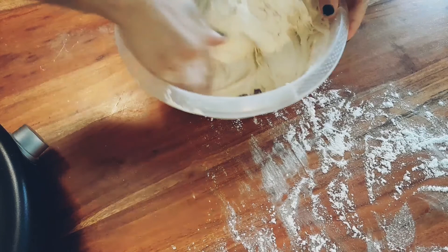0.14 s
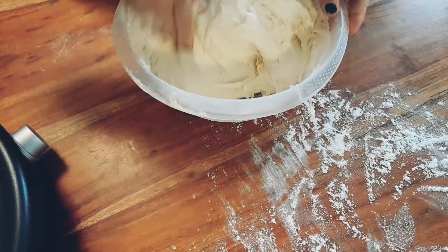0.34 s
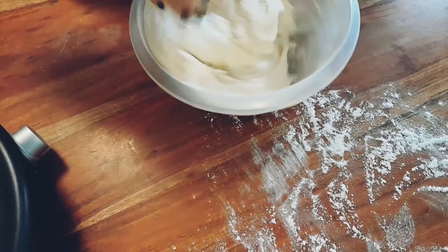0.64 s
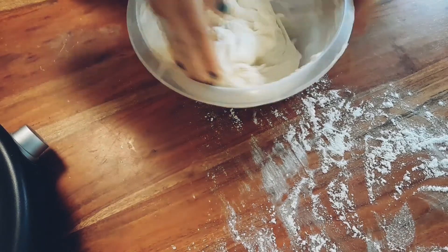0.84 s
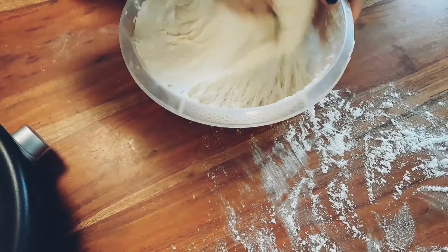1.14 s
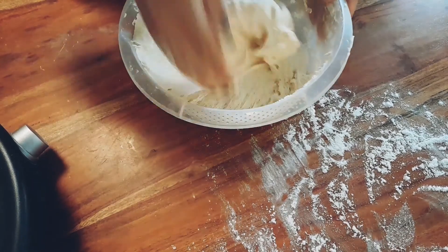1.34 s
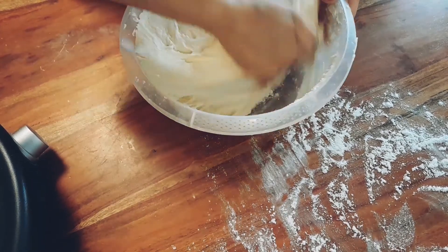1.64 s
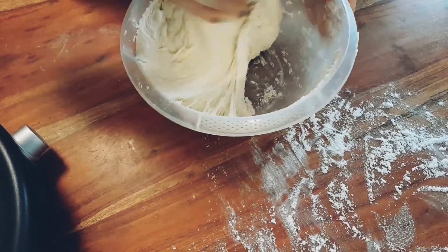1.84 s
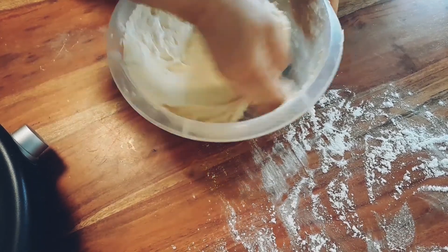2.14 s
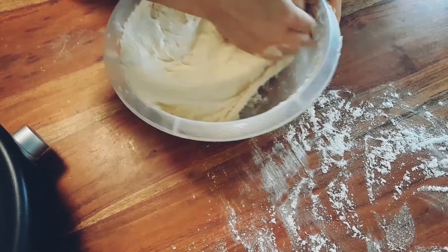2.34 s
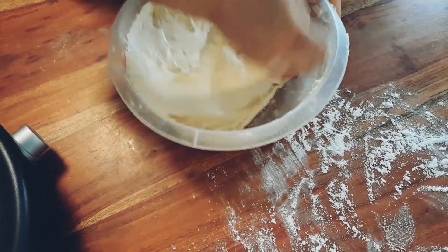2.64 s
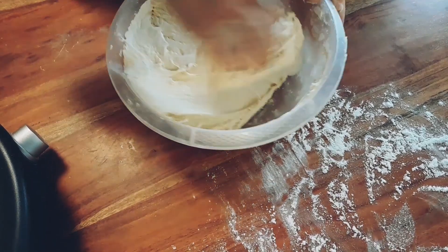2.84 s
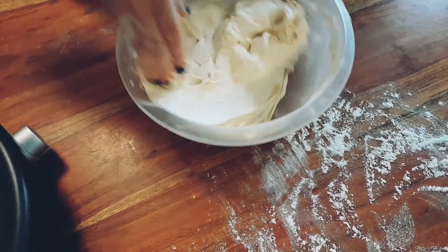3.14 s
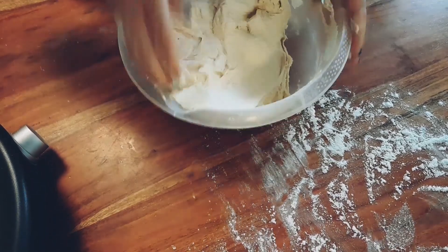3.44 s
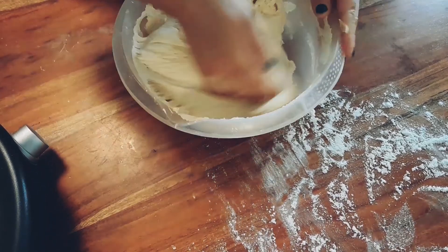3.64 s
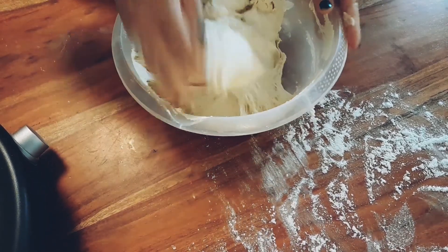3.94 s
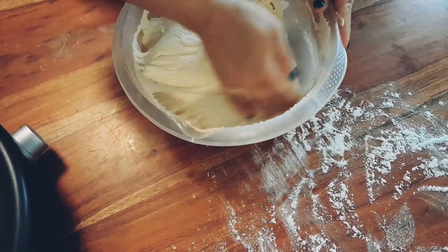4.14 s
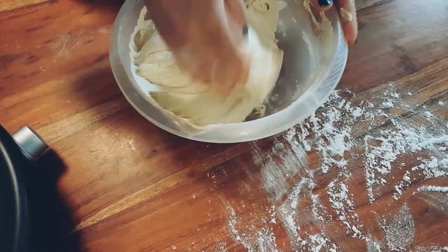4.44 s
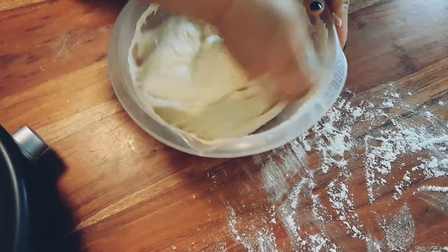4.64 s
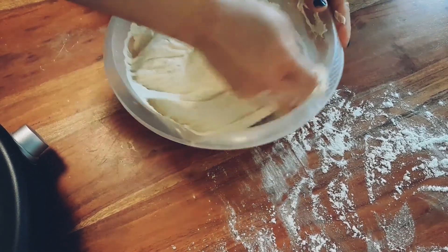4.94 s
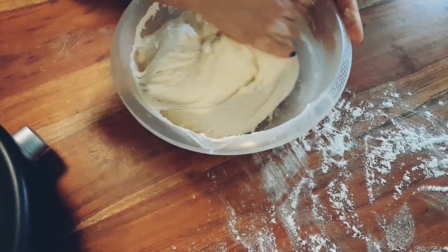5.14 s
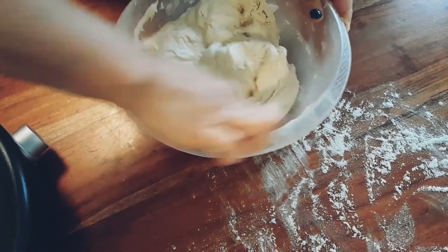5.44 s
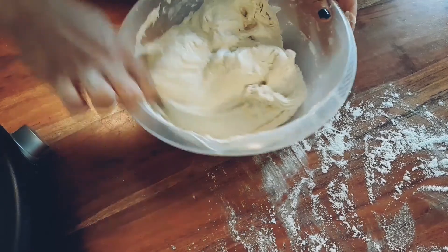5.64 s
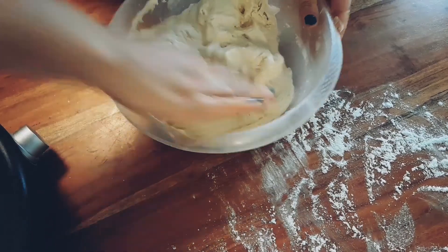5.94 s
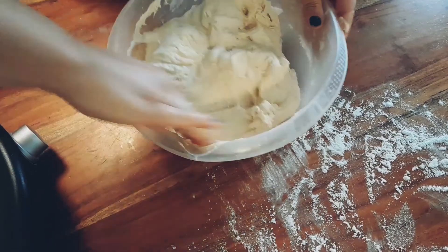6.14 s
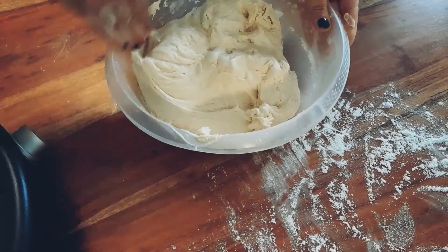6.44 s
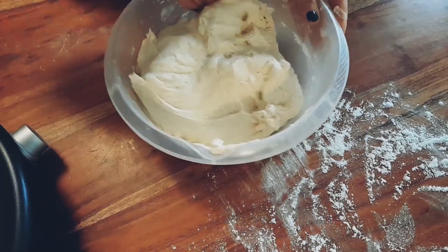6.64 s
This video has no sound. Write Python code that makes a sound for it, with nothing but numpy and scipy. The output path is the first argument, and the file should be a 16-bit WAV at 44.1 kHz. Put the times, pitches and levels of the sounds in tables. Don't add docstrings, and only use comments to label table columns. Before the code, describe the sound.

Hands knead sticky dough in a plastic bowl on a wooden table, with wet squelches, popping air pockets, slaps and low thumps.

```python
import sys
import numpy as np
from scipy import signal
from scipy.fft import rfft, irfft, next_fast_len
from scipy.io import wavfile
from scipy.ndimage import uniform_filter1d, map_coordinates

SR = 44100
rng = np.random.default_rng(int(sys.argv[2]) if len(sys.argv) > 2 else 0)


def ratio_of_db(decibels):
    return 10 ** (np.asarray(decibels, float) / 20)


def to_wav(sig):
    pcm = np.clip(np.atleast_2d(sig), -1, 1) * 32767
    pcm = np.round(pcm).astype(np.int16)
    wavfile.write(sys.argv[1], SR, pcm.T)


N = 299174

SCENE_CHANGES = [0, 1.42, 2.534, 3.467, 5.392, 6.02, 6.79]

# (frequency [Hz], density [dB per Hz])
HUSH = [(25, -14), (134, 7), (270, -.4), (416, -12), (754, -17), (962, -6), (7310, -8.5), (16000, -29)]
# (frequency [Hz], density [dB per Hz])
HISS = [(3000, -31), (7000, 2), (10000, -2), (15700, 1)]
# (frequency [Hz], coherence [0 to 1])
ALIKE = [(100, 0.38), (300, 0.71), (800, 0.65), (2500, 0.29), (8000, 0.18), (14000, 0.26)]
# (frequency [Hz], t60 [s])
KITCHEN = [(200, 0.27), (1000, .36), (4000, 0.41), (12000, 0.2)]

TABLE_HZ = (63.5, 92, 133.5)
# (frequency [Hz], level [dB], t60 [s])
PLANKS = [(228.4, -1.5, 0.26), (250, 1.5, 0.076), (307, 2, 0.096), (348, -10.5, 0.33)]
# (frequency [Hz], width [Hz], level [dB])
DRAG = [(229, 60, 0), (179, 42, -3), (99, 61, -2.5), (309, 99, -5.5)]
# (time [s], low mode [dB], second mode over it [dB], time to fall 20 dB [s])
ROCKS = [(.004, -46, 6, .1), (.1, -46, -7, .17), (.47, -72, 7, .4), (.646, -38, 9, .17),
         (.908, -44, 7.5, .16), (1.255, -50.5, -2, .11), (1.46, -43.5, -5, .1), (1.85, -74, 9, .1),
         (1.964, -68, -8, .06), (2.142, -61, 1.5, .2), (2.36, -72, 14, .08), (2.563, -54, -7, .28),
         (2.871, -61.5, 4, .18), (3.17, -64, -10.5, .12), (3.505, -52, 2.5, .15), (3.776, -71, -8, .15),
         (3.896, -50, 0.2, .085), (4.03, -49, -7, .2), (4.116, -53, -10.5, .1), (4.394, -74, 5, .15),
         (4.575, -55, -5, .33), (4.84, -36, -4, .13), (4.92, -45, 0.2, .25), (5.05, -41, 2.5, .13),
         (5.45, -54, 0.2, .2), (5.54, -40.5, -2.5, .16), (5.815, -59, -1.5, .1), (6.04, -40.5, -12, .17),
         (6.11, -43, -8, .09), (6.26, -63, -8, .12), (6.606, -72, 5, .15)]
# (time [s], peak level [dB])
KNOCKS = [(0.038, -51), (0.107, -45.5), (0.148, -50), (0.62, -39.5), (0.643, -34), (0.689, -37),
          (0.805, -40), (0.891, -38), (0.923, -35.5), (1.228, -57), (1.438, -56.5), (2.103, -47),
          (2.135, -49), (2.351, -63), (2.534, -51), (3.151, -54), (3.474, -50.5), (3.54, -56), (3.865, -57),
          (4.017, -65), (4.583, -59), (4.657, -48.5), (4.818, -46), (4.908, -35), (4.999, -37),
          (5.037, -37), (5.395, -62), (5.468, -45), (5.512, -44), (6.026, -51)]

# (frequency [Hz], density [dB per Hz])
FIZZ = [(1940, -6.5), (3300, -3), (4450, -1), (6570, -1.5), (7480, 1.2), (9580, -8), (14100, -6.5),
        (15600, -13)]
# (frequency [Hz], width [Hz], level [dB])
SMACK = [(1993, 960, -7.5), (3000, 900, -4), (3480, 1300, -8)]
# (frequency [Hz], width [Hz], level [dB])
AIR = [(1022, 350, 30), (1460, 100, -20), (836, 600, -4)]
# (frequency [Hz], width [Hz], level [dB])
WALL = [(420, 74, 5.5), (508, 300, -3), (356, 69, 0), (636, 45, 1)]
# (peak time [s], fizz [dB], time to climb 20 dB [s], time to fall 20 dB [s], depth [dB])
STROKES = [(.11, -49.5, .07, .21, -7), (.665, -42, .22, .22, -6), (.914, -44, .06, .2, -7),
           (1.12, -55, .3, .1, .2), (1.27, -60, .1, .08, -1.5), (1.501, -53.5, .15, .3, -6),
           (1.79, -59, .45, .11, -1.5), (1.97, -57.5, .1, .38, -.6), (2.25, -53.5, .17, .13, .2),
           (2.692, -53, .45, .08, -6), (2.95, -55.5, .2, .2, -1.5), (3.24, -44.5, .45, .17, -11),
           (3.565, -47, .4, .11, -11), (4.124, -52.5, .17, .12, -6.5), (4.256, -58, .07, .13, -4),
           (4.66, -50.5, .24, .11, -7.5), (4.825, -55, .08, .4, -2.5), (5.128, -51, .12, .035, -15),
           (5.256, -55, .25, .085, -13), (5.44, -53.5, .03, .3, .2), (5.7, -57, .1, .17, -6),
           (6.013, -52, .11, .1, -13), (6.356, -58.5, .2, .3, -5), (6.51, -51.5, .08, .2, -16),
           (6.63, -56, .3, .3, -10.5)]
# (time [s], fizz [dB], time to fall 20 dB [s], depth [dB], wall over air [dB])
TEARS = [(.041, -61, .12, -4, 2.5), (.809, -43, .09, -5, 2.5), (1.304, -72, .07, 9, -7),
         (2.107, -45, .03, -9, 2.5), (2.12, -50, .3, -4.5, -1.5), (2.357, -51, .09, 7, -5),
         (2.54, -48, .03, -7, -5), (3.755, -64, .15, -9, 6), (3.79, -63, .13, 22, -6),
         (3.997, -68, .08, 9, 4), (4.912, -58, .2, .2, .2), (5.008, -44, .18, -12, 8),
         (5.085, -47, .09, -19, .2), (5.399, -53, .09, -5, .2), (6.029, -54, .5, -3.5, -2.5)]
# (peak time [s], air [dB], time to climb 20 dB [s], time to fall 20 dB [s], wall over air [dB])
SQUEEZES = [(.14, -67, .2, .24, 8), (.65, -49, .05, .17, 5), (.914, -55, .03, .15, 11),
            (1.2, -61, .2, .1, .2), (1.5, -67, .4, .4, 6), (1.83, -57, .1, .07, .2),
            (2.79, -64, .15, .15, -11), (3.05, -60, .45, .2, .2), (3.12, -58, .1, .1, -8),
            (3.23, -55, .08, .08, -10), (3.3, -59, .1, .15, .5), (3.62, -61, .1, .14, .2),
            (3.9, -65, .2, .1, 7), (4.16, -68, .2, .1, 6), (4.4, -78, .3, .1, 9),
            (5.108, -48.5, .1, .07, -9), (5.32, -76, .2, .1, 8), (5.445, -53, .02, .15, 5),
            (5.84, -78, .3, .15, 12), (6.31, -47, .17, .13, -4), (6.42, -62, .1, .1, 3),
            (6.63, -57, .2, .12, -14)]

# (time [s], peak level [dB], pitch [Hz], room level [dB])
SNAPS = [(0.0363, -45, 2070, 5), (0.1007, -49, 2380, 3), (0.6474, -34, 2120, 2), (0.8031, -33, 6700, -6),
         (1.3009, -54, 2280, -16), (1.4296, -63, 7180, 8.5), (2.1021, -32, 6700, -14),
         (2.3506, -47, 2130, -12), (2.5356, -47, 6500, -6), (2.991, -50, 1900, -5), (3.1894, -42, 4600, 2),
         (3.469, -58, 7920, 17), (3.7813, -57, 1950, 10), (4.6114, -47, 4520, 8.5), (4.9072, -48, 5070, -2),
         (5.0007, -23, 5260, -5), (5.3946, -40, 2130, -15), (5.4365, -40.5, 2250, -6),
         (6.0237, -40.5, 2520, -7), (6.3475, -34.5, 2480, -13), (6.4906, -47, 7140, 17)]
# (time [s], peak level [dB], pitch [Hz], room level [dB])
SECOND_SNAPS = [
    (5.0033, -20.5, 5200, -6),
    (5.0015, -20.5, 2750, -7),
    (3.7815, -45, 2700, -2),
    (5.0078, -33, 5600, -6),
    (.8038, -34, 4700, -9),
    (5.0022, -31, 7100, 1.5),
    (2.1025, -40, 3000, -12),
]
# (frequency [Hz], level [dB])
SNAP_COLOUR = [(3000, .1), (7000, 1.5), (10000, -5), (13000, .5), (15500, -5)]
# (frequency [Hz], left over right [dB])
SNAP_PAN = [(2000, -.5), (4500, -4), (9000, -2.5)]
# (time [s], peak level [dB], pitch [Hz], room level [dB])
POPS = [(0.104, -47, 410, -3), (0.646, -36, 950, -2), (0.8035, -35, 520, -11), (0.891, -46, 506, 1),
        (1.202, -49, 1260, -7), (1.301, -54, 1350, -12), (1.505, -49.5, 1210, 7), (1.819, -48, 460, -3),
        (2.103, -43.5, 542, -1.5), (2.138, -58, 500, -12), (2.252, -47.5, 420, -7), (2.351, -35, 993, -9),
        (2.375, -42, 900, -8), (2.535, -53, 700, 2), (2.865, -61, 440, 8), (3.151, -48, 780, -6),
        (3.279, -52, 420, 2), (3.47, -51, 930, 12), (3.782, -23, 926, -6), (3.9915, -42, 800, -11),
        (4.636, -49, 850, 4.5), (4.908, -47, 600, -17), (5.001, -28.5, 1510, -23), (5.397, -48, 1410, 5),
        (5.437, -33, 985, -5), (5.438, -41, 400, -7), (5.547, -49, 950, -6), (5.696, -53, 1070, 4),
        (6.024, -44, 1020, -3), (6.241, -47, 1030, -3), (6.687, -52, 1290, -1.5), (6.705, -54, 1100, -5)]
# (multiple of the pitch, level [dB])
POCKET = [(1.42, -9), (2.02, -12), (2.65, -17)]

# (peak time [s], level [dB], time to climb [s], time to fall 20 dB [s])
CREAK = [
    (6.213, -53, .01, .08),
    (6.243, -45, .012, .06),
    (6.303, -37, .07, .09),
    (6.356, -42, .03, .09),
]
# (frequency [Hz], width [Hz], level [dB])
RIM = [(1035, 80, 1.5), (600, 190, -9.5), (1960, 250, -12), (2650, 350, -11)]

# (frequency [Hz], left over right [dB])
LEFT = [(100, 3.3), (300, 3.3), (600, 3.5), (1500, 8), (4000, 1.2), (8000, 7), (13000, 6.3)]

ROCK_RISE_S, TEAR_RISE_S = .035, .008
RISE_BEND, ROCK_BEND, STROKE_BEND, TEAR_BEND = 1.05, 1.35, 1.6, 1.3
SECOND_STEEPER = 1.25
SMACK_LATE, BOWL_LATE, BOWL_STEEPER = 1.05, 1.9, 1.25
TREMBLE_DB = -81
SMACK_DB, SMACK_DEPTH, WALL_DB = 1.5, .4, -5.5
PATCHY_DB = 2
USUAL_HZ, ENDS = 1000, 1.6
MOST_WET_DB = 2
LEAD = 8.67
BASS_CUT_HZ, TOP_HZ = 50, 15900


def along(points, hz):
    f, v = np.transpose(points)
    return np.interp(np.log(hz + 1), np.log(f + 1), v)


def unit(x):
    return x / np.sqrt(np.mean(x ** 2) + 1e-20)


def wobble(rate):
    at = np.arange(0, N + 16, 16)
    knots = rng.standard_normal(int(N * rate / SR) + 4)
    return np.interp(np.arange(N), at, map_coordinates(knots, [at * rate / SR]))


def filtered(x, response):
    m = next_fast_len(N + SR // 2)
    return irfft(rfft(x, m) * response(np.fft.rfftfreq(m, 1 / SR)), m)[..., :N]


def resonant(modes):
    def response(f):
        total = 0
        for k, (centre, width, db) in enumerate(modes):
            damping = 1j * f * width
            total = total + (-1) ** k * ratio_of_db(db) * damping / (centre * centre - f * f + damping)
        return total
    return response


def sides(pan_db):
    return ratio_of_db(np.array([pan_db / 2, -pan_db / 2]))


def grains(colour, spiky_db, lumpy_db, rate):
    size = ratio_of_db(spiky_db * np.minimum(rng.exponential(size=N), 7) + lumpy_db * wobble(rate))
    z = signal.stft(size * rng.standard_normal((2, N)), nperseg=512)[2]
    patches = uniform_filter1d(rng.standard_normal(z.shape[1:]), size=4, axis=0)
    patches = uniform_filter1d(patches, size=9, axis=1)
    pair = signal.istft(z * ratio_of_db(PATCHY_DB * unit(patches)), nperseg=512)[1][:, :N]

    def mid_side(hz):
        turn = np.arccos(np.clip(along(ALIKE, hz), -1, 1)) / 2
        return colour(hz) * np.array([np.cos(turn), np.sin(turn)])

    mid, side = filtered(pair, mid_side)
    return unit(np.array([mid + side, mid - side]))


def swells(s, rise_s, fall_s, bend, late=1, steeper=1):
    s, t = np.asarray(s)[:, None], np.arange(N * 1000 // SR + 2) / 1000
    climb = late * (abs(s - t) / np.reshape(rise_s, (-1, 1))) ** RISE_BEND
    fall = steeper * (abs(t - s) / np.reshape(fall_s, (-1, 1))) ** np.reshape(bend, (-1, 1))
    event_view = np.searchsorted(SCENE_CHANGES, s, side="right")
    inside = event_view == np.searchsorted(SCENE_CHANGES, t, side="right")
    return np.where(inside, -20 * np.where(t < s, climb, fall), -200)


def joined(peak_db, shape_db):
    power = np.sum(ratio_of_db(np.reshape(peak_db, (-1, 1)) + shape_db) ** 2, axis=0)
    return np.interp(np.arange(N) * 1000 / SR, np.arange(len(power)), np.sqrt(power))


def add(track, s, sound):
    a = round(s * SR)
    change_s = min(c for c in SCENE_CHANGES if c > s + .005)
    b = min(a + sound.shape[-1], N, round(change_s * SR))
    track[..., a:b] += sound[..., :b - a]


def hush():
    return ratio_of_db(-70) * grains(lambda hz: ratio_of_db(along(HUSH, hz)), spiky_db=.1, lumpy_db=.5, rate=8)


def hiss():
    return ratio_of_db(-70.5) * grains(lambda hz: ratio_of_db(along(HISS, hz)), spiky_db=.1, lumpy_db=.5, rate=8)


def table():
    t = np.arange(N) / SR
    s, low_db, over_db, fall_s = np.transpose(ROCKS)
    shape = swells(s, ROCK_RISE_S, fall_s, ROCK_BEND)
    low = ratio_of_db(TREMBLE_DB) + joined(low_db, shape)
    second = ratio_of_db(TREMBLE_DB - 5) + joined(low_db + over_db, SECOND_STEEPER * shape)
    middle = ratio_of_db(-7) * np.sqrt(low * second)
    ring = np.zeros(N)
    for hz, gain in zip(TABLE_HZ, (low, middle, second)):
        uneven = np.sqrt(2) * gain * ratio_of_db(2.7 * wobble(35))
        ring += uneven * np.sin(2 * np.pi * hz * t + 1.43 * wobble(16))
    shudder = grains(resonant(DRAG), spiky_db=2.7, lumpy_db=3.5, rate=31)[0]
    ring += ratio_of_db(-11.5) * second * shudder

    t = t[:SR // 3]
    push = (1 - t / 0.00052) * np.exp(-t / 0.002)
    soft_start = 1 - np.exp(-t / 0.0022)
    for s, db in KNOCKS:
        modes = np.zeros(len(t))
        for hz, level, t60 in PLANKS:
            modes += ratio_of_db(level + rng.normal(0, 2.6) - 60 * t / t60) * np.sin(2 * np.pi * hz * t)
        add(ring, s, ratio_of_db(db - 3.5) * (modes + .9 * push) * soft_start)
    return ring


def hands():
    tears = [(s, db, TEAR_RISE_S, fall_s, depth) for s, db, fall_s, depth, _ in TEARS]
    s, db, rise_s, fall_s, depth = np.transpose(STROKES + tears)
    squeeze_s, squeeze_db, squeeze_rise_s, squeeze_fall_s, squeeze_wall = np.transpose(SQUEEZES)
    bend = [STROKE_BEND] * len(STROKES) + [TEAR_BEND] * len(TEARS)
    fizz = joined(db, swells(s, rise_s, fall_s, bend))
    smack_db = db + SMACK_DB + SMACK_DEPTH * depth
    smack = joined(smack_db, swells(s, rise_s, fall_s, bend, SMACK_LATE))
    stirred = swells(s, rise_s, fall_s, bend, BOWL_LATE, BOWL_STEEPER)
    squeezed = swells(squeeze_s, squeeze_rise_s, squeeze_fall_s, STROKE_BEND)
    bowl = np.vstack([stirred, squeezed])
    air_db = np.r_[db + depth, squeeze_db]
    wall_over_air = np.r_[[WALL_DB] * len(STROKES), [row[-1] for row in TEARS], squeeze_wall]
    return fizz, smack, joined(air_db, bowl), joined(air_db + wall_over_air, bowl)


def rubbing():
    bright, wet, hollow, dull = hands()
    fizz = bright * grains(lambda hz: ratio_of_db(along(FIZZ, hz)), spiky_db=2.0, lumpy_db=1.6, rate=50)
    smack = wet * grains(lambda hz: abs(resonant(SMACK)(hz)) ** 1.1, spiky_db=2.5, lumpy_db=1.5, rate=30)
    air = hollow * grains(lambda hz: abs(resonant(AIR)(hz)) ** 1.17, spiky_db=1.0, lumpy_db=2.5, rate=99)
    wall = dull * grains(lambda hz: abs(resonant(WALL)(hz)) ** 1.09, spiky_db=1.0, lumpy_db=1.6, rate=35)
    drag = ratio_of_db(-8) * dull * grains(resonant(DRAG), spiky_db=0.6, lumpy_db=5, rate=25)
    return fizz + smack + air + wall + drag


def kitchen(x):
    hz, t, z = signal.stft(rng.standard_normal((2, SR // 2)), SR, nperseg=256)
    decay = ratio_of_db(-60 * t / along(KITCHEN, hz)[:, None])
    tail = signal.istft(z * decay, SR, nperseg=256)[1]
    tail = np.pad(tail / np.linalg.norm(tail[0]), ((0, 0), (260, 0)))
    return signal.fftconvolve(x[None], tail, axes=1)


def bursts(events, cycles, rough, reach, echo_s, echo_db, overtones=()):
    out, t = np.zeros((2, N)), np.arange(SR // 50) / SR
    for s, db, hz, room_db in events:
        decay = np.exp(-(t * np.sqrt(hz * max(hz, USUAL_HZ)) / cycles) ** ENDS)
        fade = decay * (1 - np.exp(-t * hz * 3))
        ring = sum(ratio_of_db(level) * np.sin(2 * np.pi * k * hz * t) for k, level in [(1, 0), *overtones])
        band = signal.butter(2, [hz / 2, min(reach * hz, 15000)], "bandpass", fs=SR)
        edge = unit(signal.lfilter(*band, rng.standard_normal(len(t)))) * np.exp(-t / 0.0011)
        burst = ratio_of_db(db + 8.5) * (fade * ring + rough * edge)
        radiated = signal.butter(3, [hz / 3.5, min(3.7 * hz, 17000)], "bandpass", fs=SR)
        burst = signal.lfilter(*radiated, burst)
        add(out, s + 0.00036, burst)
        add(out, s + 0.00036 + echo_s, ratio_of_db(echo_db) * burst)
        add(out, s + .0004, ratio_of_db(min(room_db, MOST_WET_DB)) * kitchen(burst))
    return out


def snaps():
    events = SNAPS + SECOND_SNAPS
    dry_snaps = bursts(events, cycles=2.95, rough=0.57, reach=2.3, echo_s=0.0024, echo_db=-16.5)
    return filtered(dry_snaps, lambda hz: ratio_of_db(along(SNAP_COLOUR, hz)) * sides(along(SNAP_PAN, hz)))


def pops():
    return bursts(POPS, cycles=2.8, rough=0.32, reach=1.46, echo_s=.0078, echo_db=-8, overtones=POCKET)


def creak(slip_hz, scatter, uneven_db):
    count = int(N * slip_hz / SR)
    gaps = SR / slip_hz * (1 + scatter * rng.uniform(-1, 1, count))
    at = np.cumsum(gaps).astype(int)
    slips = np.bincount(at, ratio_of_db(uneven_db * rng.standard_normal(count)), minlength=N)[:N]
    s, db, rise_s, fall_s = np.transpose(CREAK)
    grip = joined(db, swells(s, rise_s, fall_s, bend=1.4))
    return -grip * unit(filtered(slips, resonant(RIM)))


def scene():
    background = hush() + hiss()
    dough = table() + rubbing() + creak(slip_hz=210, scatter=.2, uneven_db=1.6)
    return background + dough + snaps() + pops()


def band_limit(x):
    return signal.sosfilt(signal.butter(12, 16970, fs=SR, output="sos"), x)


def record(dry):
    def ports(hz):
        lead = np.exp(1j * np.pi * hz * LEAD / SR * np.array([[1], [-1]]))
        bass_cut = hz ** 2 / np.hypot(hz ** 2, BASS_CUT_HZ ** 2)
        return lead * sides(along(LEFT, hz)) * (hz < TOP_HZ) * bass_cut

    mix = filtered(dry, ports)
    return band_limit(mix)


dry = scene()
out = record(dry)
to_wav(out)
```